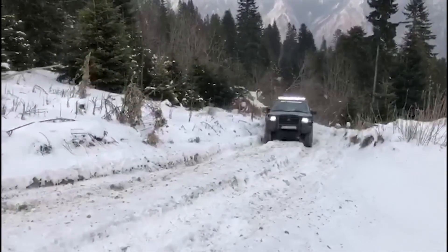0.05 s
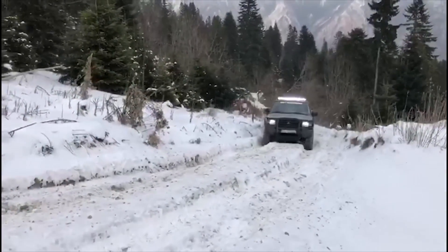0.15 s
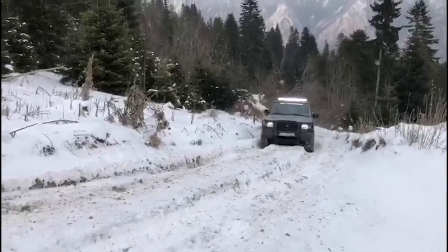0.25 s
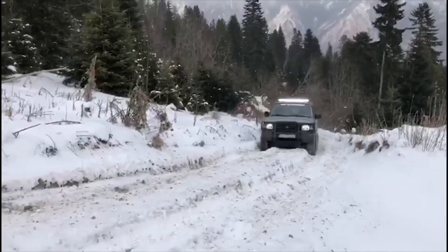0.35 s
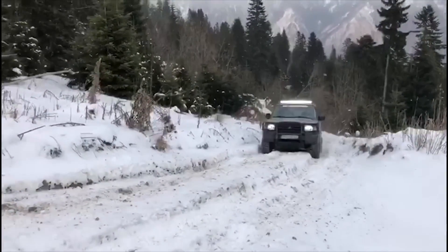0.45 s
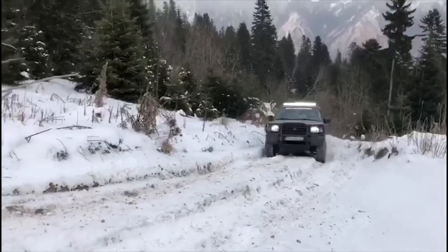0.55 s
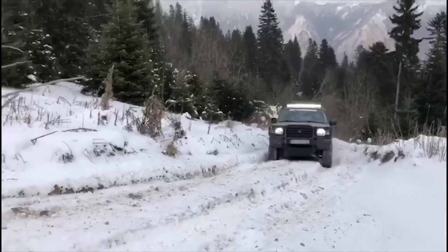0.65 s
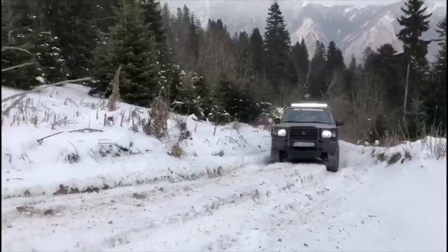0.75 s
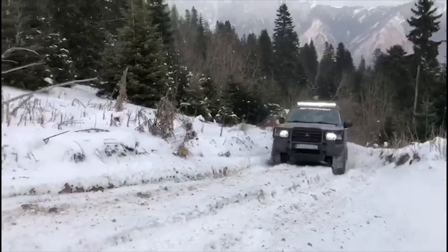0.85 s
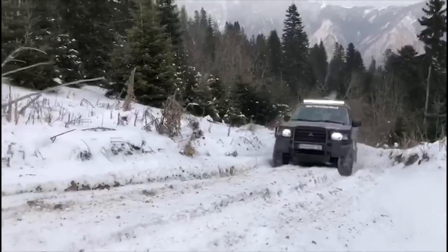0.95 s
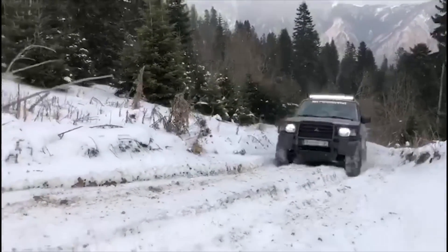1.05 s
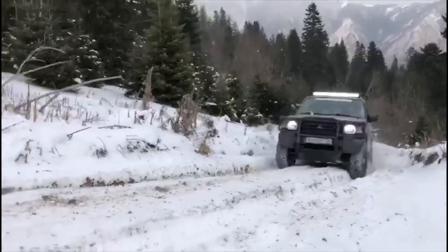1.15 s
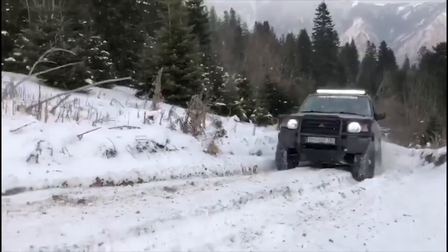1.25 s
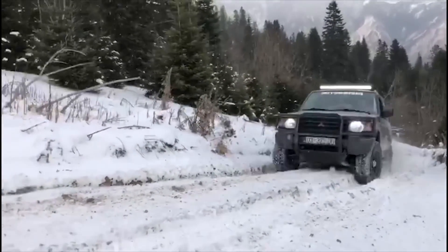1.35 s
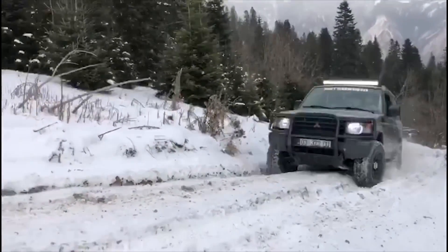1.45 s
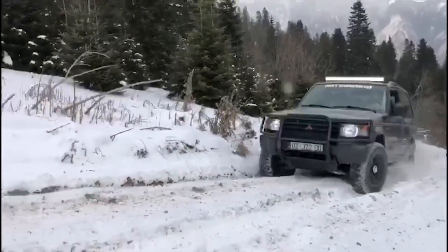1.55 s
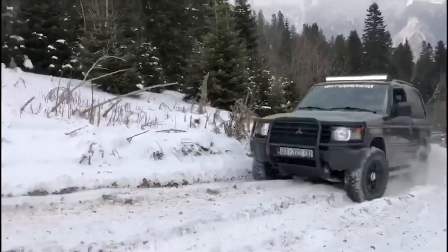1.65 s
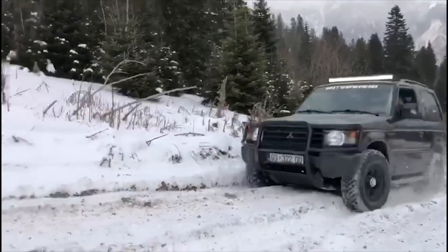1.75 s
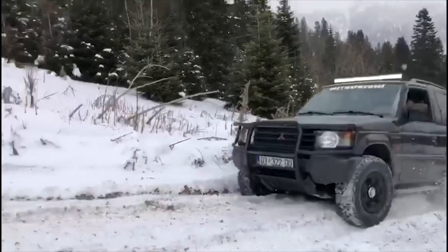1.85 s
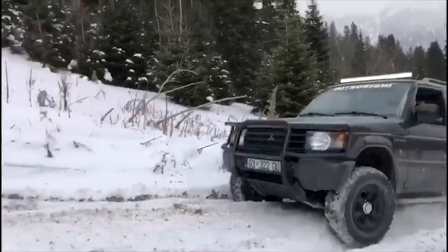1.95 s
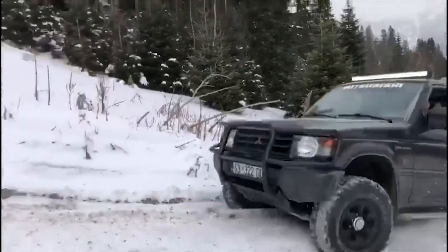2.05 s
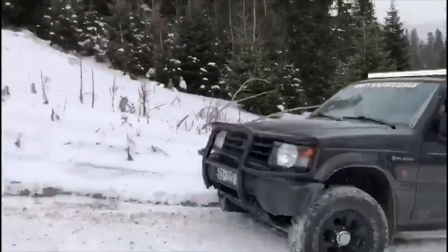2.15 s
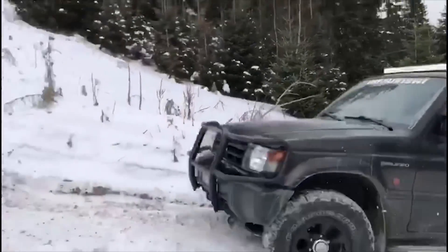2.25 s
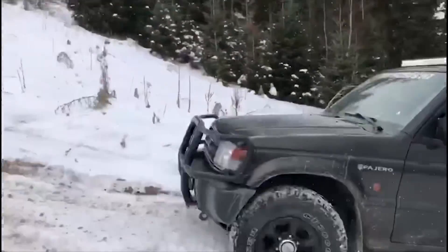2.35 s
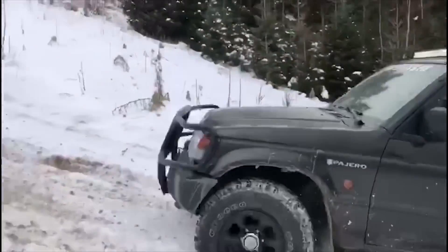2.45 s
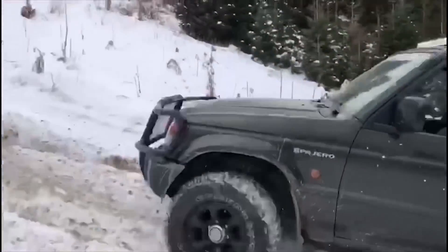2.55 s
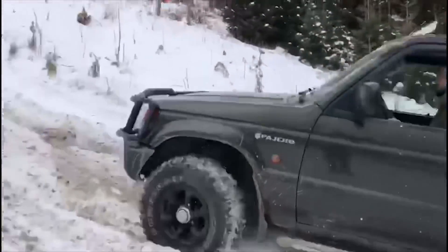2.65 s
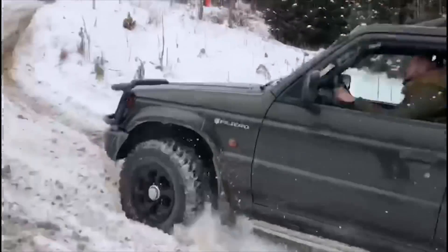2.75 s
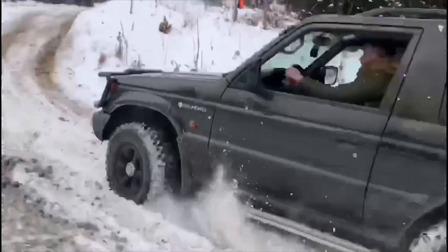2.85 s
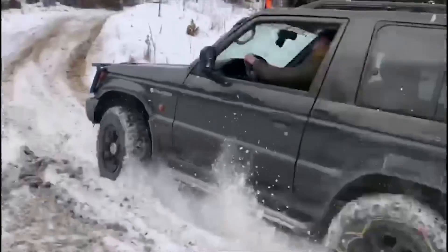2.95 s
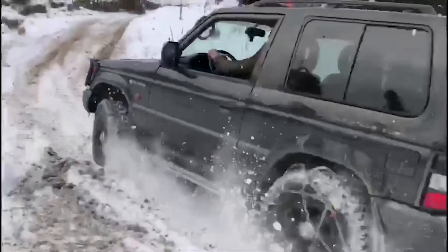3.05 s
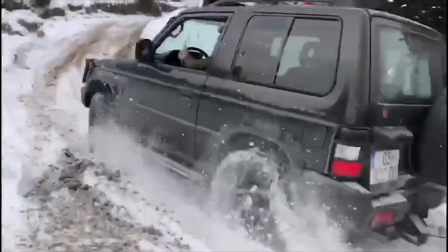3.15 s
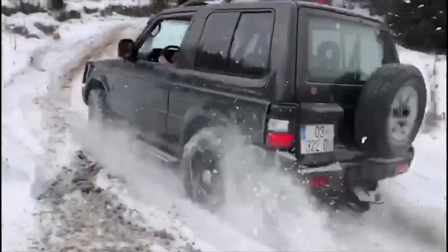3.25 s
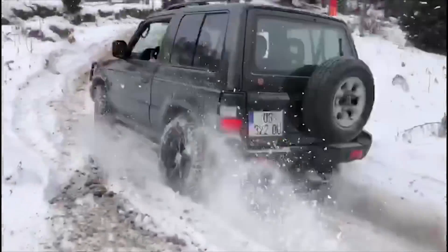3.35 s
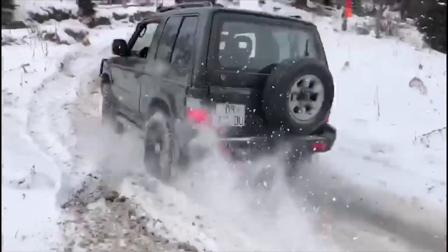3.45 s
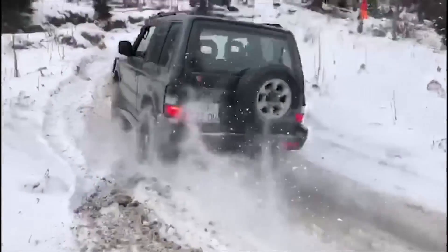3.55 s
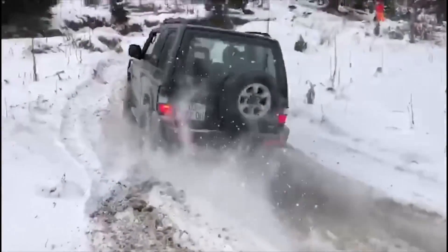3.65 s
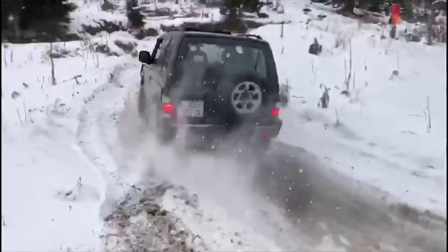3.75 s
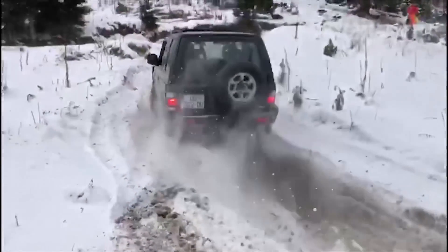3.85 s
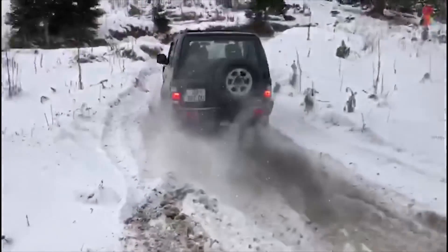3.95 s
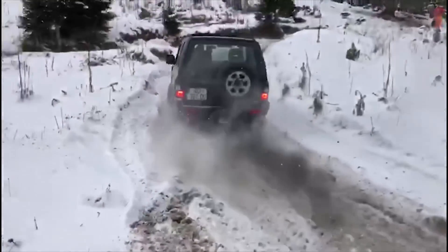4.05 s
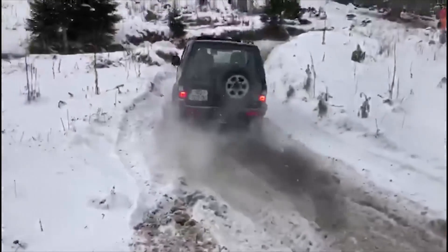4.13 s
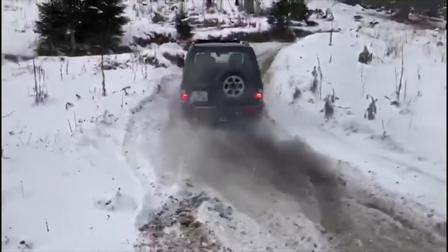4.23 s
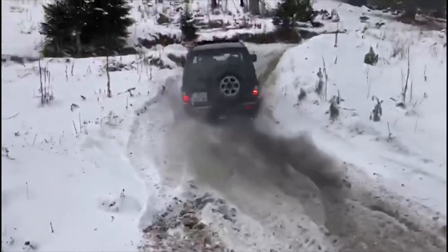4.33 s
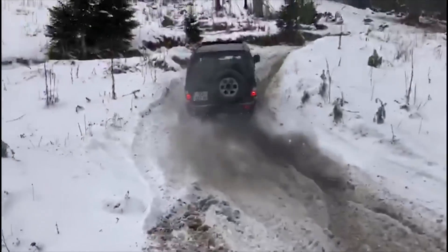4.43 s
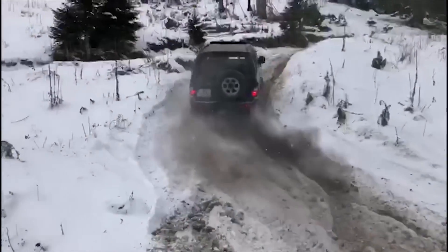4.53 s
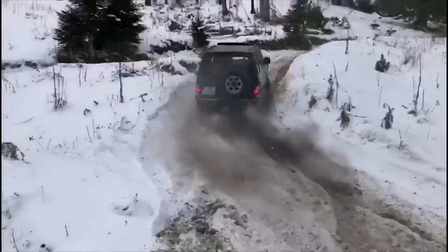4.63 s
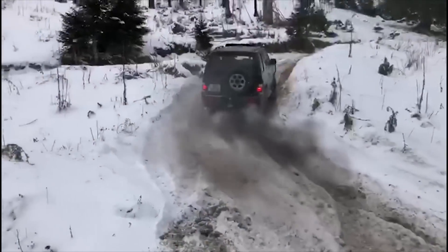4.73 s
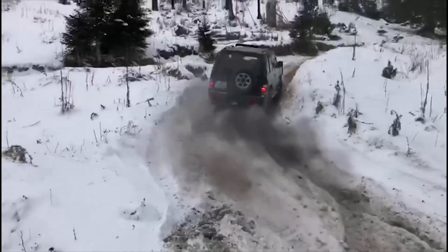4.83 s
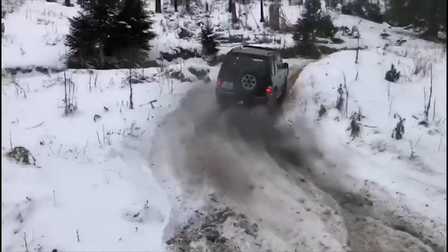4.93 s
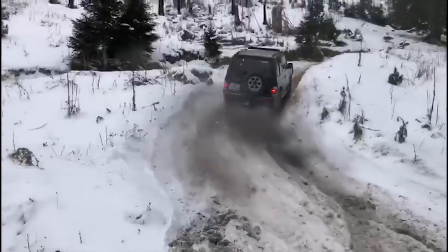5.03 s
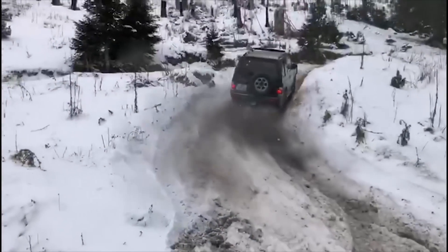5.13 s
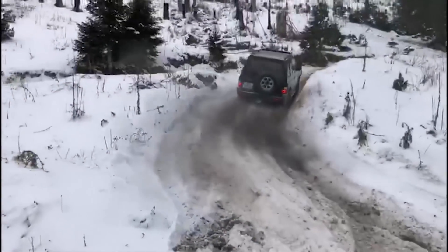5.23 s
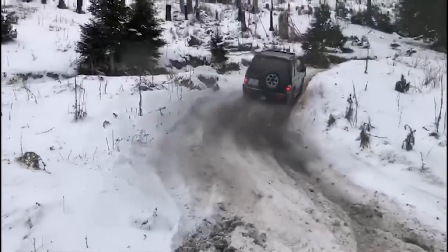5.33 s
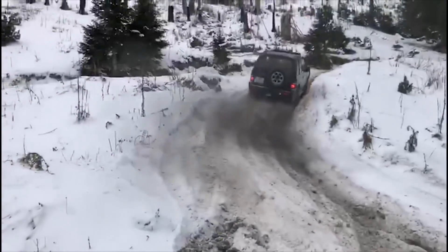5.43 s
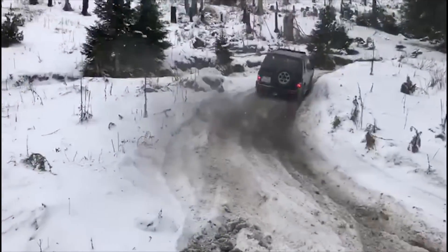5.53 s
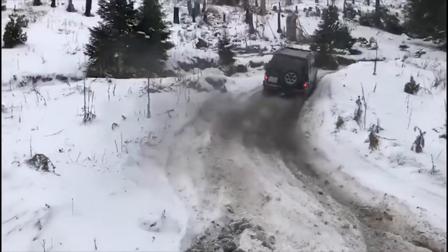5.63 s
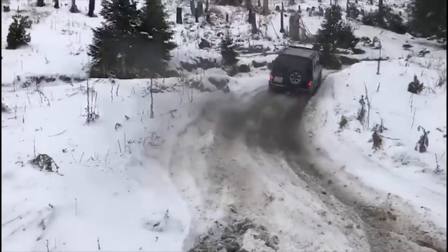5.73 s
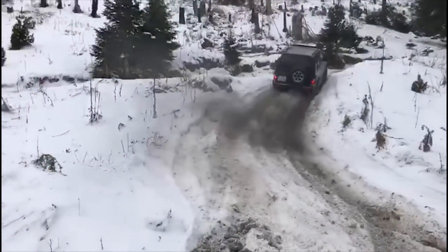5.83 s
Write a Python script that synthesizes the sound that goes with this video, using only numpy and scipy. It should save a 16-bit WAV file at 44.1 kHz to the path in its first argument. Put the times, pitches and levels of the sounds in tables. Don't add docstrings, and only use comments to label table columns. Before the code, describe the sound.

A hard-working diesel engine grows from far to very close, its rattle coloured by shifting echoes off snow. Heavy dull suspension bumps and a quick cluster of metallic knocks come just before it passes. Then clatter gives way to a deep firing drone, sprayed snow and rushing exhaust, receding uphill at lower revs. Fixed small microphone at the trackside, open air, slightly lossy treble.

```python
import sys
import numpy as np
from scipy import signal
from scipy.io import wavfile
from scipy.ndimage import uniform_filter1d

SR = 44100
rng = np.random.default_rng(int(sys.argv[2]) if len(sys.argv) > 2 else 0)


def wav_out(sig):
    wavfile.write(sys.argv[1], SR, np.round(np.clip(np.atleast_2d(sig).T, -1, 1) * 32767).astype(np.int16))


def elevation(decibels):
    levels = np.asarray(decibels, float)
    return 10 ** (levels / 20)


N = 259308
T = np.arange(N) / SR
HZ = np.fft.rfftfreq(1024, 1 / SR)[:, None]

# (time [s], crank speed [Hz], firing tone [dB])
ENGINE_RUN = [(0, 65.47, -49), (.28, 63.1, -41), (.7, 64.25, -46), (.9, 62, -42), (1.25, 63.6, -39.5),
              (1.53, 61.5, -37.5), (1.67, 63.2, -42), (1.95, 58.01, -39.5), (2.37, 60.7, -30.5),
              (3.07, 62.4, -27), (3.62, 62.8, -22.5), (3.9, 60.7, -25), (4.1, 62.6, -26.5),
              (4.6, 62.04, -30.5), (4.95, 59.6, -29), (5.2, 55.4, -32), (5.57, 53.9, -29.5),
              (5.88, 57, -34)]


def evened(x):
    return x / np.sqrt(np.mean(x ** 2) + 1e-20)


def columns(rows, t):
    s, *values = np.transpose(rows)
    return [np.interp(t, s, v) for v in values]


def step(t, at_s, spread_s):
    return 1 / (1 + np.exp((at_s - t) / spread_s))


def bell(t, at_s, half_s):
    return np.exp(-((t - at_s) / half_s) ** 2)


def wander(smooth):
    drift = uniform_filter1d(rng.standard_normal(N), smooth)
    return evened(uniform_filter1d(drift, smooth))


def colour(points, lo_hz, hi_hz):
    f, db = np.transpose(points)
    gain = elevation(np.interp(np.log(HZ + 1), np.log(f), db, left=-90, right=-90))
    in_band = (HZ > lo_hz) * (HZ < hi_hz)
    return gain / np.sqrt(np.mean(gain ** 2 * in_band))


def noise(shape, patchy_db, streaky_db, flicker_db):
    t, z = signal.stft(rng.standard_normal(N), SR, nperseg=1024, noverlap=768)[1:]
    patches = evened(uniform_filter1d(uniform_filter1d(rng.standard_normal(z.shape), 8, 0), 10, 1))
    streaks = evened(uniform_filter1d(uniform_filter1d(rng.standard_normal(z.shape), 4, 0), 40, 1))
    flicker = evened(uniform_filter1d(rng.standard_normal(len(t)), 5))
    field_db = patchy_db * patches + flicker_db * flicker
    field_db = field_db + streaky_db * np.clip(HZ / 6000, 0, 1) * streaks
    return signal.istft(z * shape(t) * elevation(field_db), nperseg=1024, noverlap=768)[1][:N]


def throb(turns, fire, turn, cycle):
    swing = fire * np.cos(4 * np.pi * turns)
    swing = swing + turn * np.cos(2 * np.pi * turns + 1)
    swing = swing + cycle * np.cos(np.pi * turns + 2)
    return np.exp(swing) / np.sqrt(np.mean(np.exp(2 * swing)))


def spreading_db(t):
    # (time [s], distance of the car [m])
    path = [
        (0, 30),
        (1.0, 15.2),
        (1.6, 9.7),
        (2.1, 6.16),
        (2.6, 4.04),
        (3.2, 3.7),
        (3.7, 5.4),
        (4.3, 9.3),
        (5.0, 14.7),
        (5.88, 21.9),
    ]
    return -20 * np.log10(columns(path, t)[0] / 4)


def front_db(t, near_db, fall, shadow_db):
    return near_db + fall * spreading_db(t) + shadow_db * step(t, at_s=3.24, spread_s=0.29)


def ground(hz, notches, stretch, share):
    f, strength = np.transpose(notches)
    lag = np.interp(hz / stretch, np.r_[0, f], np.r_[.5, 1 + np.arange(len(f))])
    echo = np.clip(share * np.interp(hz / stretch, f, strength), 0, .97)
    return abs(1 - echo * np.exp(2j * np.pi * lag)) / np.sqrt(1 + echo ** 2)


def behind(t):
    # (notch [Hz], echo strength [0-1])
    snow_notches = [(480, .7), (1180, .74), (1870, .72), (2570, .97), (3270, .45), (3980, .15), (4680, 0)]
    # (notch [Hz], echo strength [0-1])
    bank_notches = [(3200, 0), (4170, .35), (4640, .3), (5110, .6), (5850, .4), (6800, .55), (7650, .5),
                    (8350, .45), (9300, .55), (10200, .6), (11200, .4)]
    slide = .42 * bell(t, at_s=2.6, half_s=.62)
    slide = slide + .018 * bell(t, at_s=3.7, half_s=.6)
    bank_s = 3.55
    bank_stretch = .995 + .015 * np.exp(np.minimum(bank_s - t, 0))
    bank = ground(HZ, bank_notches, bank_stretch, .7 * step(t, bank_s, spread_s=.14))
    snow = ground(HZ, snow_notches, 1 + slide, 1 - 3 * slide ** 2)
    return 1 + slide, snow * bank


def tyres():
    # (frequency [Hz], level [dB])
    thud_curve = [(20, -30), (40, -18), (65, 1), (100, -2.5), (160, -6), (230, -12)]
    # (frequency [Hz], level [dB])
    drone_curve = [(110, -22), (170, 1), (250, -0.5), (330, -5), (450, -17.5), (600, -13)]
    # (time [s], half length [s], thud change [dB], drone change [dB])
    rumble_swells = [(0.081, 0.099, 1, 0.5), (0.455, 0.12, 1, -5), (.9, .1, 1.5, -2.5), (2.053, 0.072, -1, 0.5),
                     (2.35, 0.097, 0.5, -1), (2.748, 0.11, 0, -2), (3.152, 0.09, 3, 2.5), (3.7, 0.083, 0, 4),
                     (3.943, 0.085, -4, -5), (4.599, .1, 2, 3), (5.0, .1, 0, 1), (5.693, .08, -7, -4)]

    def shape(t):
        thud_db, drone_db = sum(np.outer(more_db, bell(t, s, half_s)) for s, half_s, *more_db in rumble_swells)
        thud = elevation(-32.5 + 0.53 * spreading_db(t) + thud_db)
        drone = elevation(-29.5 + 0.89 * spreading_db(t) + drone_db)
        return np.hypot(thud * colour(thud_curve, 30, 100), drone * colour(drone_curve, 200, 420))

    return noise(shape, patchy_db=0.17, streaky_db=-2, flicker_db=1.1)


def knocks(events, overtone, overtone_db, rise_s, rattle):
    out = np.zeros(N)
    t = np.arange(8000) / SR
    for s, db, hz, t60_s in events:
        ring = np.sin(2 * np.pi * hz * t)
        ring = ring + elevation(overtone_db) * np.sin(2 * np.pi * overtone * hz * t)
        drift = uniform_filter1d(uniform_filter1d(rng.standard_normal(len(t)), 30), 30)
        loose = 1 + rattle * evened(drift)
        envelope = elevation(db - 60 * t / t60_s) * (1 - np.exp(-t / rise_s))
        out[round(s * SR):][:len(t)] += envelope * ring * loose
    return out


def rut_bumps():
    # (time [s], peak [dB], frequency [Hz], t60 [s])
    bumps = [
        (1.619, -13, 108, 0.08),
        (2.118, -23, 172, 0.058),
        (2.286, -10, 147, 0.1),
        (2.439, -3.5, 124, 0.091),
        (2.719, -15, 118.2, 0.047),
        (2.879, -24, 126.5, 0.054),
        (3.129, -8.5, 123.8, 0.088),
        (3.589, -12, 130, 0.1),
        (3.649, -22, 127, 0.076),
    ]
    return knocks(bumps, overtone=1.9, overtone_db=-6, rise_s=0.0074, rattle=0.11)


def body_clunks():
    # (time [s], peak [dB], frequency [Hz], t60 [s])
    clunks = [
        (2.327, -19.5, 929, 0.063),
        (2.422, -17.5, 1095, 0.033),
        (2.435, -21, 907, 0.092),
        (2.472, -17, 1140, 0.032),
        (2.491, -16, 933, 0.068),
        (2.540, -13.5, 1105, 0.074),
    ]
    return knocks(clunks, overtone=1.85, overtone_db=-11.5, rise_s=0.0021, rattle=0.65)


def ice_ticks():
    # (time [s], peak [dB], frequency [Hz], t60 [s])
    ticks = [
        (2.1604, -28, 8000, 0.0087),
        (2.167, -21, 7700, 0.0076),
    ]
    return knocks(ticks, overtone=1.14, overtone_db=-6, rise_s=0.00097, rattle=0)


def spray():
    # (time [s], half length [s], centre [Hz], level [dB])
    showers = [(2.91, 0.036, 3600, -46), (3.18, .07, 3820, -30.5), (3.2, 0.19, 2110, -29.5),
               (3.27, 0.19, 4670, -40.5), (3.436, 0.085, 3824, -35), (3.08, 0.054, 3150, -40),
               (5.6, 0.16, 3150, -44), (5.7, 0.066, 3700, -53), (4.096, .15, 5100, -48),
               (4.32, 0.084, 2700, -51), (5.2, .1, 3700, -44), (4.699, 0.27, 5000, -46),
               (5.25, 0.18, 4900, -49), (5.68, 0.15, 3890, -45), (5.65, .15, 4640, -49),
               (5.65, .15, 5470, -54.5), (3.75, 0.17, 4900, -52.5)]

    def shape(t):
        hiss = sum(elevation(db) * bell(t, s, half_s) * evened(bell(HZ, hz, 340)) for s, half_s, hz, db in showers)
        return behind(t)[1] * hiss

    return noise(shape, patchy_db=1.5, streaky_db=1.5, flicker_db=.6)


def block(turns):
    # (order [per turn], level [dB])
    far_orders = [(3.5, -21), (4.5, -22), (5.0, -20), (5.5, -28), (6.0, -27), (7.0, -26), (8.0, -28),
                  (10.0, -25), (11.0, -27), (26.0, -30), (12.0, -25), (14.0, -25), (16.5, -26), (17.5, -28)]
    # (order [per turn], level [dB])
    near_orders = [(3.5, -20), (4.5, -23), (5.0, -22), (5.5, -18), (6.0, -20), (6.5, -20), (7.0, -20),
                   (8.0, -23), (12.0, -30), (13.0, -27), (14.0, -26), (14.5, -30), (15.0, -29), (18.0, -27)]
    # (frequency [Hz], level [dB])
    clatter_curve = [(150, -38), (400, 1.5), (900, -1), (1400, -2), (1900, -2.5), (2300, -9), (2800, -15)]
    # (frequency [Hz], level [dB])
    rattle_curve = [(1900, -25), (2400, -2), (3100, -3), (3700, -1.5), (4300, -7), (5000, -11), (5800, -28)]
    # (frequency [Hz], level [dB])
    fan_curve = [(4200, -59), (5200, -1), (6500, 0), (8000, 2), (9500, -0.5), (10500, -4), (11700, -9)]
    # (notch [Hz], echo strength [0-1])
    front_notches = [(560, .75), (1300, .5), (2230, .5), (3050, .5), (4100, .3), (5150, .3), (6100, 0)]

    def clatter_db(t):
        return front_db(t, near_db=-31.5, fall=0.75, shadow_db=-17)

    def shape(t):
        clatter = elevation(clatter_db(t)) * colour(clatter_curve, 700, 3000)
        rattle = elevation(front_db(t, near_db=-45.5, fall=0.53, shadow_db=-13)) * colour(rattle_curve, 2575, 4400)
        fan = elevation(front_db(t, near_db=-48, fall=0.63, shadow_db=-2)) * colour(fan_curve, 5600, 9550)
        stretch = .98 + .17 * np.minimum(t / 3, 1) ** 1.5
        echo = ground(HZ, front_notches, stretch, 1 - step(t, at_s=2.1, spread_s=.22))
        return np.hypot(np.hypot(clatter, rattle), fan) * echo

    close = step(T, at_s=1.75, spread_s=0.034)
    lines = 0
    for orders, share, smooth in ((far_orders, 1 - close, 7000), (near_orders, close, 2500)):
        for k, db in orders:
            gain = share * elevation(db + 1.14 * (k > 10.5) + 2.6 * wander(smooth))
            lines = lines + gain * np.cos(2 * np.pi * (k * turns + rng.random()))
    hash_noise = noise(shape, patchy_db=1.2, streaky_db=2.0, flicker_db=.6)
    gated = hash_noise * throb(turns, fire=.15, turn=.06, cycle=.05)
    return elevation(clatter_db(T) + 15) * lines + gated


def low_orders(turns):
    # (time [s], order [per turn], half length [s], level [dB])
    booms = [(0.51, 4, 0.74, -45.5), (0.88, 3, 0.11, -40.5), (1.1, 3, .1, -36), (1.35, 4, 0.21, -33),
             (1.32, 3, 0.065, -40), (1.7, 4, 0.15, -34.5), (1.87, 3, 0.41, -30.5), (1.91, 13, 0.26, -39),
             (1.2, 28, 0.37, -45), (1.25, 30, 0.12, -51), (2.48, 35, .22, -41), (2.4, 22, 0.26, -43),
             (0.69, 14, 0.59, -65), (2.22, 3, 0.13, -33.5), (2.353, 4, 0.12, -30.5), (2.62, 3, 0.12, -28.5),
             (2.89, 4, 0.12, -30), (3.116, 3, 0.13, -26), (3.585, 4, 0.13, -45), (3.4, 3, 0.16, -39),
             (1.57, 11, 0.33, -43.5), (3.9, 3, .2, -33), (4.04, 4, .09, -36.5), (5.3, 3, 0.34, -40.5),
             (5.64, 3, 0.075, -46), (5.7, 4, 0.44, -44)]
    boom_orders = (3, 4, 11, 13, 14, 22, 28, 30, 35)
    levels = [elevation(columns(ENGINE_RUN, T)[1])]
    for k in boom_orders:
        levels.append(sum(elevation(db) * bell(T, s, half_s) for s, order, half_s, db in booms if round(order) == k))
    out = 0
    for k, gain in zip((2,) + boom_orders, levels):
        waver = elevation(2.0 * wander(500))
        phase_turns = k * turns + min(k, 9) * .018 * wander(500)
        out = out + np.sqrt(2) * gain * waver * np.cos(2 * np.pi * phase_turns)
    return out


def exhaust(turns):
    # (time [s], flow [dB], off-axis treble loss [dB])
    jet_sweep = [(2.98, -32, -9.5), (3.05, -27.5, -17), (3.26, -23, -8.5), (3.39, -22.5, -1.5),
                 (3.51, -21, -14), (3.565, -23.5, -7), (3.65, -26, -18.5), (3.77, -31.5, -13),
                 (3.81, -25.5, -11.5), (3.93, -22, -21), (4.2, -28.5, -14.5), (4.3, -32, -20.5),
                 (4.53, -32, -8.5), (4.76, -30, -11.5), (5.06, -34, -22.5), (5.22, -32, -10.5),
                 (5.47, -32.5, -19), (5.88, -38.5, -14.5)]
    # (frequency [Hz], level [dB])
    growl_curve = [(300, -5), (480, 3.5), (800, 0), (1150, 2.5), (1500, -79)]
    # (frequency [Hz], level [dB])
    roar_curve = [(900, -23.5), (1250, 1.5), (1500, -0.5), (2200, -1), (2700, -17.5), (3300, -30)]
    # (frequency [Hz], level [dB])
    edge_curve = [(2000, -28), (2500, 2), (3700, 1.5), (4000, -4.5), (4500, -8), (5200, -40)]
    # (frequency [Hz], level [dB])
    hiss_curve = [(3600, -22), (4300, -9), (4850, -6), (5400, -5.5), (6000, 1), (6900, 0), (8600, 2),
                  (11700, -11)]

    def shape(t):
        flow_db, off_db = columns(jet_sweep, t)
        edge_db = flow_db - 4.5 + 0.38 * off_db
        hiss_db = flow_db + off_db
        growl_db = -31.5 + spreading_db(t - 0.34)
        emerging = np.clip((t - 2.6) / 0.57, 0, 1)
        roar, edge, hiss, growl = elevation(np.array([flow_db, edge_db, hiss_db, growl_db])) * emerging
        stretch, echoes = behind(t)
        growl = growl * elevation(0.7 * bell(HZ, 900 * stretch, 120))
        roar = roar * elevation(7.9 * (stretch - 1) * bell(HZ, 1580 * stretch, 140))
        low = np.hypot(growl * colour(growl_curve, 650, 1725), roar * colour(roar_curve, 1250, 2100))
        high = np.hypot(edge * colour(edge_curve, 2660, 4600), hiss * colour(hiss_curve, 5700, 10400))
        return np.hypot(low, high) * echoes

    jet = noise(shape, patchy_db=1.5, streaky_db=2.14, flicker_db=0.5)
    jet = jet * throb(turns, fire=0.024, turn=0.014, cycle=0.009)
    whistle_s = 3.2
    whistle_hz = 1078 - 83 * (T - whistle_s)
    whistle_gain = np.sqrt(2) * bell(T, whistle_s, half_s=0.08) * elevation(-27 + 3.1 * wander(700))
    return jet + whistle_gain * np.cos(2 * np.pi * np.cumsum(whistle_hz) / SR)


def scene():
    turns = np.cumsum(columns(ENGINE_RUN, T)[0]) / SR
    road = tyres() + rut_bumps() + body_clunks() + ice_ticks() + spray()
    engine = block(turns) + low_orders(turns) + exhaust(turns)
    return (road + engine)[None]


def treble_gaps(x):
    hz, t, z = signal.stft(x, SR, nperseg=2048, noverlap=1536)
    hz_col = hz[:, None]
    band = uniform_filter1d(uniform_filter1d(abs(z) ** 2, size=5, axis=0), size=4, axis=1)
    mask = uniform_filter1d(band, size=60, axis=0)
    luck = evened(uniform_filter1d(rng.standard_normal(z.shape), size=10, axis=1))
    limit_db = 9.8 - 5.5 * np.clip(hz_col / 11000, 0, 1) ** 2 + 2.4 * luck
    weak = (band * elevation(2 * limit_db) < mask) & (hz_col > 3500)
    weak = weak[np.arange(len(hz)) // 5 * 5 + 2 * (hz < 20000)]
    sag = np.interp(t, [0, .6, 1.6, 3.5, 4.5, 5.88], [1.04, .8, 0.18, 0.34, 1.1, 0.92])
    wobble = evened(uniform_filter1d(rng.standard_normal(len(t)), 7))
    top_hz = 11700 - 170 * (sag + wobble)
    gap = (abs(hz_col - 10600) < 600) & (abs(t - 3.425) < .075)
    keep = 1 - (weak | gap | (hz_col > top_hz))
    return signal.istft(z * keep, nperseg=2048, noverlap=1536)[1][:N]


def roll_off(x):
    return signal.sosfilt(signal.butter(12, 11990, fs=SR, output="sos"), x)


def record(dry):
    bass_cut = signal.butter(2, 42, "high", fs=SR, output="sos")
    thin = signal.sosfilt(bass_cut, dry[0])
    mix = treble_gaps(thin)[None]
    return roll_off(mix)


dry = scene()
out = record(dry)
wav_out(out)
```